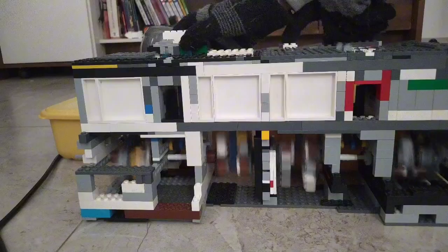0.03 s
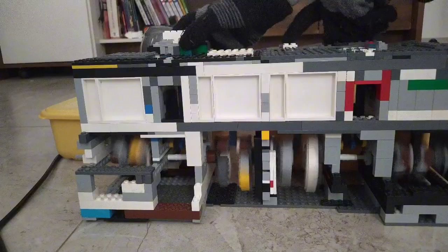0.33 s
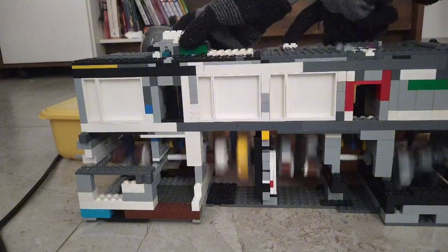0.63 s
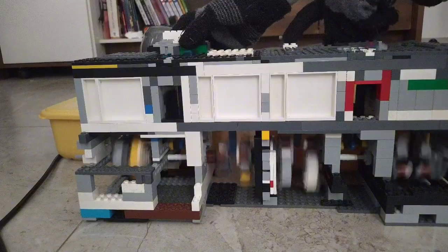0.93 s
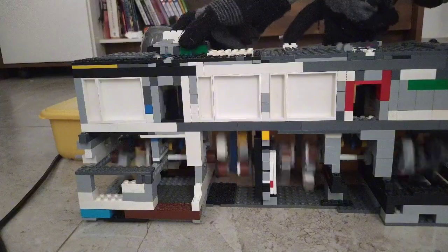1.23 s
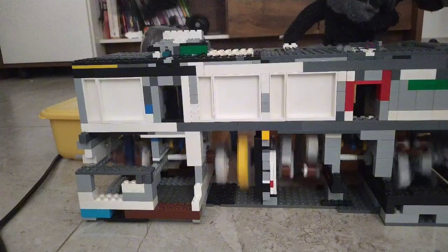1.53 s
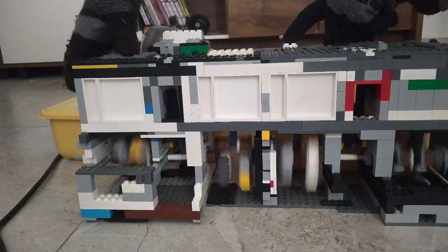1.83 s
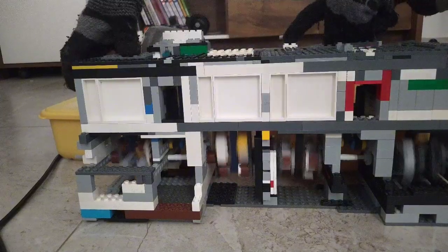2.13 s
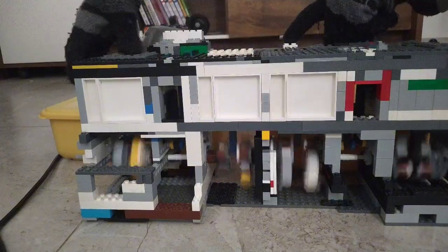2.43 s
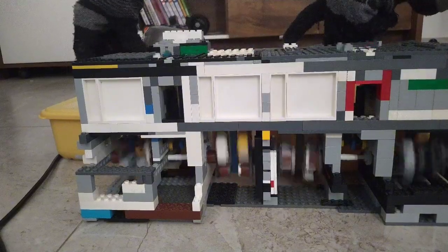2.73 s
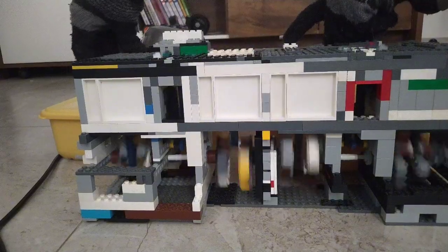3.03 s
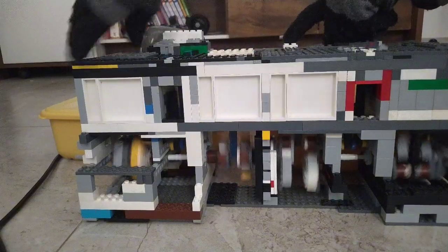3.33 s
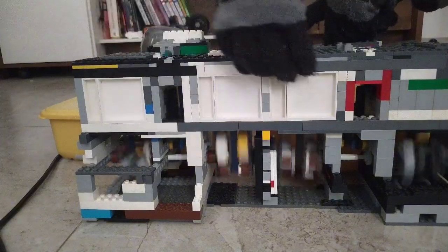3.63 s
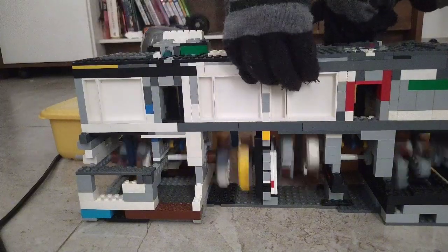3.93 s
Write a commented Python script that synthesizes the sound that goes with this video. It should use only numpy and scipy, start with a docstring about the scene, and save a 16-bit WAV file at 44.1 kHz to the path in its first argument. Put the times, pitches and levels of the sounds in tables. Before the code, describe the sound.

Vacuum motors roar and whine steadily, spinning a toy-brick piston engine on a hard indoor floor. Air hisses and chuffs as plastic pistons clatter and knock. After about a second, clicks thin out and the motors speed up slightly.

```python
"""Two vacuum motors roar and whine, beating against each other, over a rattle of plastic.
Their suction spins a toy-brick piston engine on a hard floor: air hisses through the valves and
chuffs with each stroke, loose pistons clatter and knock, and a few bricks click.
After a second a hand leaves the throttle and the motors speed up a little."""
import sys
import numpy as np
from scipy import signal
from scipy.fft import rfft, irfft
from scipy.io import wavfile

SR = 44100
rng = np.random.default_rng(int(sys.argv[2]) if len(sys.argv) > 2 else 0)


def wav_out(sig):
    """Save sig, one row per channel (or a flat mono array), as 16-bit PCM at SR to the path in sys.argv[1]."""
    wavfile.write(sys.argv[1], SR, np.round(np.clip(np.atleast_2d(sig).T, -1, 1) * 32767).astype(np.int16))


N = 176400
TIME = np.arange(N) / SR
BIN_HZ = np.arange(N // 2 + 1) * SR / N
RELEASE_S, TONE_LAG_S = .98, .23  # hand leaves the throttle; valves and ticks follow with this lag


def from_db(db):
    return 10 ** (np.asarray(db) / 20)


def unit_rms(x):
    return x / np.sqrt(np.mean(x ** 2) + 1e-20)


def pan(db):
    """Stereo gains for a left-right level difference."""
    return from_db(np.array([[.5], [-.5]]) * db)


def per_bin(points):
    """(f/Hz, value) rows interpolated to every bin on a log axis."""
    hz, value = np.transpose(points)
    return np.interp(np.log(BIN_HZ + 1e-9), np.log(hz), value)


def settled(lag_s, start_s=RELEASE_S):
    """First-order step from 0 to 1."""
    return 1 - np.exp(-np.maximum(TIME - start_s, 0) / lag_s)


def burst(t, rise_s):
    """Swells to 1 at rise_s, then decays."""
    u = np.clip(t / rise_s, 0, 50)
    return u * np.exp(1 - u)


def tone(cycles):
    """Sine of rms 1."""
    return np.sqrt(2) * np.sin(2 * np.pi * cycles)


def ring(drive, hz, t60_s):
    """Two-pole resonator: a unit impulse starts a decaying unit sine."""
    r, w = from_db(-60 / (t60_s * SR)), 2 * np.pi * hz / SR
    return signal.lfilter([0, np.sin(w)], [1, -2 * r * np.cos(w), r * r], drive + 1e-18)


def waver(depth_db, rate_hz):
    """Randomly wandering gain."""
    drift = irfft(rfft(rng.standard_normal(N)) / (1 + (BIN_HZ / rate_hz) ** 2), N)
    return from_db(depth_db * unit_rms(drift))


def standing_waves(depth_db=2.5, spacing_hz=14, low_hz=452, high_hz=7250):
    """Gain per bin: narrow random room peaks and dips, fading outside low_hz to high_hz."""
    heights = np.clip(rng.standard_normal(4096), -2, 2)
    peaks = np.interp(BIN_HZ / spacing_hz, np.arange(len(heights)), heights)
    band = BIN_HZ / np.hypot(BIN_HZ, low_hz) / np.hypot(1, (BIN_HZ / high_hz) ** 2)
    return from_db(depth_db * band * peaks)


def air_noise(spectrum):
    """Coloured noise with the room's stereo image; rms 1."""
    # left-right likeness: f/Hz, correlation before clipping
    likeness = [(25, 3), (60, -5), (130, 6.5), (250, 0.4), (480, 1.1), (950, 0.16), (1900, 0.32),
                (3600, -0.44), (7500, 0)]
    # stereo balance: f/Hz, left-right/dB
    balance = [(120, 8), (350, 3.5), (800, 3.5), (1700, 0), (4000, 0), (5500, -2), (7000, 0), (9200, -2.5),
               (11500, 0)]
    mid, side = rfft(rng.standard_normal((2, N)))
    correlation = np.clip(per_bin(likeness), -.99, .99)
    stereo = np.sqrt(1 + correlation) * mid + np.sqrt(1 - correlation) * side * [[1], [-1]]
    shaped = stereo * standing_waves() * from_db(per_bin(spectrum)) * pan(per_bin(balance))
    return unit_rms(irfft(shaped, N))


def room(x, t60_s=.083, tail_db=3.5):
    """Adds a short diffuse tail, different in each ear."""
    t = TIME[:SR // 2]
    tail = rng.standard_normal((2, len(t))) * np.exp(-np.log(1000) * t / t60_s)
    tail /= np.sqrt(np.sum(tail ** 2, axis=1, keepdims=True))
    return x + from_db(tail_db) * signal.fftconvolve(x, tail, axes=1)[:, :N]


def fan_roar(level_db=-21.5):
    """Steady rush of air through the fans."""
    # roar spectrum: f/Hz, relative level/dB
    roar_spectrum = [(25, -46), (70, -39), (110, -19), (170, -10.5), (300, -6), (400, -1.5), (600, -1),
                     (740, 4), (900, 2.5), (1200, -5.5), (1600, -2), (2100, -2.5), (3000, -7.5),
                     (4000, -15), (8000, -33), (15000, -34)]
    return from_db(level_db) * air_noise(roar_spectrum)


def vacuum_motors(ripple_hz=120):
    """Two whines, slightly apart in speed, with mains-ripple sidebands and hum."""
    # rotors: speed before release/Hz, after/Hz, left delay/s, right delay/s
    rotors = [(630.3, 640.1, .00015, 0), (635.63, 648.15, .00083, .00099)]
    # their fundamentals: level before/dB, after/dB, left-right before/dB, after/dB
    fundamentals = [(-25, -24.7, 7.5, 3), (-40, -27.8, 16, .5)]
    # partials of each motor: harmonic, offset/ripples, level before/dB, after/dB, left-right/dB
    partials_a = [(1, -2, -42, -50, 3), (1, 1, -43, -34.5, 4.7), (1, 2, -39, -36.5, 1),
                  (2, -2, -45, -40, 4), (2, -1, -34, -37, 5.5), (2, 0, -42, -26.8, 3.3),
                  (2, 1, -35, -45, 0), (3, -2, -41, -41.5, -4), (3, 1, -42, -39.5, -1)]
    partials_b = [(2, 0, -48, -42, 1)]
    sags_hz = (0, .6)  # the second motor slows a touch late on
    out, released = np.zeros((2, N)), settled(lag_s=.14)
    for rotor, fundamental, sag_hz, partials in zip(rotors, fundamentals, sags_hz, (partials_a, partials_b)):
        slow_hz, fast_hz, *delays_s = rotor
        speed_hz = slow_hz + (fast_hz - slow_hz) * settled(lag_s=.27)
        speed_hz -= sag_hz * settled(lag_s=.08, start_s=2.9)
        turns = np.cumsum(speed_hz) / SR - speed_hz * np.array(delays_s)[:, None]
        db0, db1, pan0, pan1 = fundamental
        gain = from_db(db0 + (db1 - db0) * released) * waver(depth_db=-2, rate_hz=16)
        out += gain * pan(pan0 + (pan1 - pan0) * released) * tone(turns)
        for harmonic, ripples, db0, db1, pan_db in partials:
            cycles = harmonic * turns + ripples * ripple_hz * TIME + rng.random()
            gain = from_db(db0 + (db1 - db0) * released) * waver(depth_db=.77, rate_hz=11)
            out += gain * pan(pan_db) * tone(cycles)
    for harmonic, hum_db in enumerate((-46, -41.5, -42.5), start=1):
        gain = from_db(hum_db) * waver(depth_db=1.2, rate_hz=3)
        out += gain * pan(db=6) * tone(harmonic * ripple_hz * TIME + rng.random())
    return out


def valve_flow(crank_hz=7.97, jitter_s=.003, scatter_db=5.5, rise_s=.0052):
    """One gulp of air per piston stroke, uneven in time and strength; rms 1."""
    # strokes in one crank turn: position/turns, relative level/dB
    strokes = [(.05, -0.5), (0.19, -1), (0.33, 2.5), (0.472, -3.5), (0.597, 0.5), (0.779, 0)]
    flow = np.zeros(N)
    for turn in range(-1, int(N / SR * crank_hz) + 1):
        for position, db in strokes:
            start_s = (turn + position) / crank_hz + jitter_s * rng.normal()
            start = int(start_s * SR)
            span = slice(max(start, 0), max(start + SR // 10, 0))
            strength = from_db(db + scatter_db * rng.uniform(-1, 1))
            flow[span] += strength * burst(TIME[span] - start_s, rise_s)
    return unit_rms(flow)


def valves(flow, chuff_db=-29, hiss_db=-21.5, pulsing=.043):
    """Each gulp chuffs in the cylinders and swells the leak hiss; throttled: more chuff, less hiss."""
    # chuff and hiss spectra: f/Hz, relative level/dB
    chuff_spectrum = [(40, -48), (100, -17), (140, -16), (163, -1), (190, -11.5), (240, -1), (290, -7.5),
                      (420, -2.5), (800, -0.5), (1200, -5.5), (3000, -20.5), (9000, -47)]
    hiss_spectrum = [(1500, -48), (3800, -29.5), (5200, -7), (6900, -12.5), (8200, -4.5), (9200, 1.5),
                     (10200, -2), (11200, -12.5), (12200, -18), (14000, -19.5), (15600, -40)]
    throttled = 1 - settled(TONE_LAG_S)
    swell = 1 - pulsing + pulsing * flow
    chuff = from_db(chuff_db + 5 * throttled) * flow * air_noise(chuff_spectrum)
    hiss = from_db(hiss_db - 2 * throttled) * swell * air_noise(hiss_spectrum)
    return chuff + hiss


def clatter(flow, taps_per_s=1500, level_db=-26):
    """Loose pistons and rods tap the bricks at a rate that scales with the flow."""
    # brick modes: f/Hz, relative level/dB, t60/s
    brick_modes = [(1156, -3.5, 0.041), (1630, -7, 0.0096), (2200, -5.5, 0.0077), (4320, 5.5, 0.0019),
                   (6430, 5, 0.0035), (7560, 4.5, 0.0049), (8140, -3, 0.011), (10630, 1.5, 0.0038),
                   (12170, -5.5, 0.0037)]
    hits = rng.random(N) < taps_per_s * flow / SR
    taps = hits * from_db(-6.5 * np.minimum(rng.exponential(1, N), 3))
    ringing = sum(from_db(db) * ring(taps * rng.standard_normal((2, N)), hz, t60_s)
                  for hz, db, t60_s in brick_modes)
    return from_db(level_db) * unit_rms(room(ringing))


def throttle_ticks(ticks_per_s=90, share_after=.45, level_db=-24.5, spread_db=.2):
    """Fine crisp rattle that thins out once the hand lets go."""
    # tick spectrum: f/Hz, relative level/dB
    tick_spectrum = [(1500, -31), (3800, -14), (6000, -5), (8000, -7), (9200, 3), (10300, 4), (11500, -6),
                     (15500, -21)]
    rate_per_s = ticks_per_s * (1 + (share_after - 1) * settled(TONE_LAG_S))
    hits = rng.random(N) < rate_per_s / SR
    ticks = hits * from_db(level_db + spread_db * np.minimum(rng.exponential(1, N), 2))
    envelope = signal.fftconvolve(ticks, burst(TIME[:SR // 50], rise_s=.00076))[:N]
    return envelope * air_noise(tick_spectrum)


def piston_knocks(t60_s=.011, frame_hz=410, frame_db=-11):
    """A loose piston judders against its cylinder, which rings hollowly over the frame's thud."""
    # knocks: t/s, peak before panning/dB, f/Hz
    knocks = [(.036, -18, 520), (.078, -15.5, 885), (.149, -15, 735), (0.335, -17, 760), (.533, -19, 415),
              (.581, -15, 880), (.7, -17.5, 835), (.772, -18, 730), (.863, -16, 920), (.965, -13, 780),
              (1.376, -17.5, 418), (1.453, -14, 880), (2.065, -20, 770), (2.155, -17, 915),
              (2.306, -18, 430), (2.722, -16, 770), (3.32, -16, 890), (3.495, -15, 780), (3.789, -18, 760),
              (3.848, -14, 880)]
    out, t = np.zeros(N + SR), TIME[:SR // 8]
    for start_s, db, hz in knocks:
        judder = rng.standard_normal(len(t)) * burst(t, rise_s=.009)
        cylinder = ring(np.diff(ring(judder, hz, t60_s / 2), prepend=0), hz, t60_s / 2)
        frame = ring(np.diff(judder, prepend=0), frame_hz, t60_s)
        knock = unit_rms(cylinder) + from_db(frame_db) * unit_rms(frame)
        start = int(start_s * SR)
        out[start:start + len(t)] += from_db(db) * knock / np.abs(knock).max()
    return pan(db=3) * out[:N]


def brick_clicks(crack_db=-10.5):
    """Plastic snaps, mostly while throttled: a broad crack, then a very short ring."""
    # snaps: t/s, level/dB, left-right/dB, f/Hz
    snaps = [(.0464, -8.5, -5, 9120), (.1727, -13.5, -6, 9200), (.2988, -9.5, -5, 9120),
             (.4238, -6.5, -4, 9040), (.4945, -5.5, -2, 8700), (.5489, -7, -4, 9040), (.6171, -5, -4, 8600),
             (.6735, -10, -3, 9050), (.7732, -14, -4, 9730), (.9019, -11.5, -7, 9190),
             (.9284, -5, -7, 9090), (3.6256, -11, -4, 9150)]
    # crack spectrum: f/Hz, relative level/dB
    crack_spectrum = [(2000, -22), (5000, 1), (10500, 2), (12500, -12), (15000, -9)]
    out, crack_noise = np.zeros((2, N)), from_db(crack_db) * air_noise(crack_spectrum)
    for start_s, db, pan_db, hz in snaps:
        t = TIME - start_s
        crack = burst(t, rise_s=.0004) * crack_noise
        ping = burst(t, rise_s=.00062) * np.sin(2 * np.pi * hz * t)
        out += from_db(db) * pan(pan_db) * (crack + ping)
    return out


def scene():
    mix = fan_roar() + vacuum_motors() + brick_clicks()
    flow = valve_flow()
    return mix + valves(flow) + clatter(flow) + throttle_ticks() + piston_knocks()


def record(dry, ceiling=.88, cutoff_hz=15650):
    """Soft peak limiting, then a steep low-pass."""
    rounded = dry / (1 + (dry / ceiling) ** 6) ** (1 / 6)
    return signal.sosfilt(signal.ellip(10, .1, 80, cutoff_hz, fs=SR, output="sos"), rounded)


dry = scene()
out = record(dry)
wav_out(out)
```